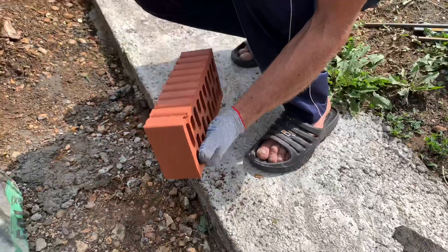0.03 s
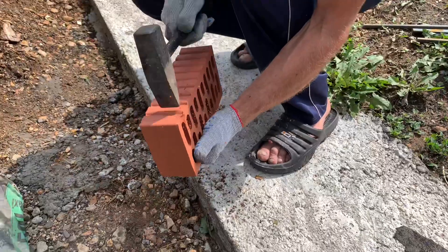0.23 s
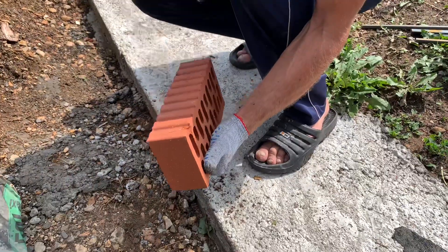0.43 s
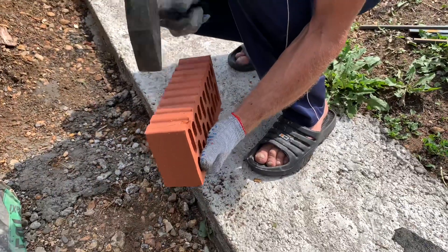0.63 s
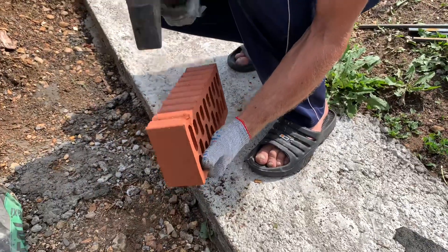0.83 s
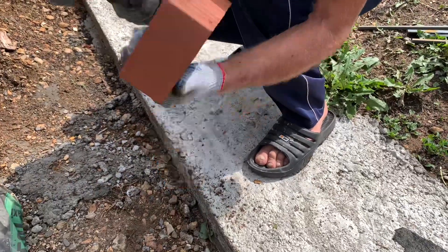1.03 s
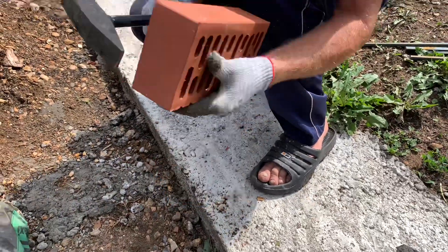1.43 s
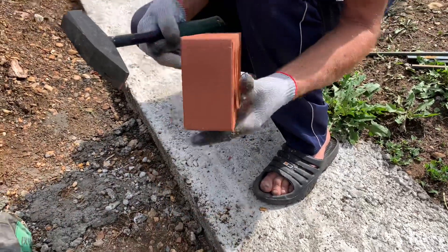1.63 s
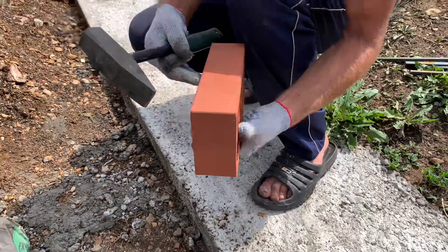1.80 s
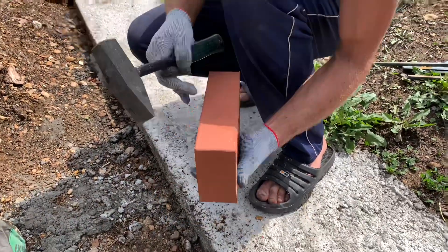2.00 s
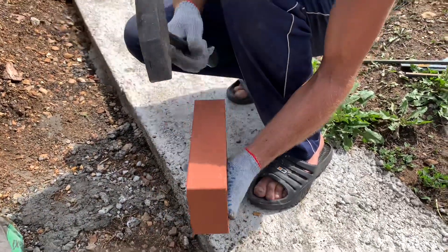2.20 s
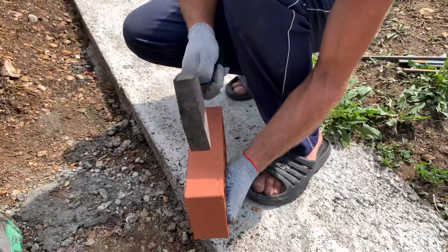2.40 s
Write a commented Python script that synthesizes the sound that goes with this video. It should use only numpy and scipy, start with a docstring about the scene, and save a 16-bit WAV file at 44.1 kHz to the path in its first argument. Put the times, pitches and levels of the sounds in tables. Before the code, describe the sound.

Two sharp hammer taps on a hollow brick, followed by faint glove rubs and bumps.

```python
"""Two sharp taps, close by and outdoors: a heavy hammer on a hollow clay brick on a concrete slab.
Each tap cracks, thuds through the slab and rings the thin clay webs until they are choked; chips tick down.
Gloves then rub, bump and clink the brick as it is turned over.
Behind it are a low rumble, a faint hiss, puffs of air and weak echoes from the yard."""
import sys
import numpy as np
from scipy import signal
from scipy.fft import rfft, irfft, next_fast_len
from scipy.io import wavfile

SR = 44100
rng = np.random.default_rng(int(sys.argv[2]) if len(sys.argv) > 2 else 0)


def put_to_file(sound):
    """Save the sound as 16-bit audio at rate SR, in the file named by the first command-line argument."""
    columns = np.atleast_2d(sound).T  # one column per channel
    safe = np.clip(columns, -1, 1)
    whole_steps = np.round(safe * 32767)
    wavfile.write(sys.argv[1], SR, whole_steps.astype(np.int16))


N = 112454
T = np.arange(N) / SR
LEAD_S = 0.0002133  # left ahead of right
SPREAD, LOW_SPREAD = .45, .25  # side over mid


def hammer():
    """Each blow: contact, a crack and shiver roughened by crumbling clay, a thud, ringing webs."""
    # Each row: start in seconds, then crack, shiver and thud gains in dB.
    blows = [(.2300, -14, -16, -3.5), (.7073, -17.5, -16.5, -9.5)]
    ring_lead_s, ring_pan_db = .00008, 4.5  # louder on the right
    hits, rings = np.zeros((2, N)), np.zeros(N)
    for blow, (start_s, crack_db, shiver_db, thud_db) in enumerate(blows):
        clay = amp(crack_db) * crack(start_s) + amp(shiver_db) * shiver(start_s, blow)
        clay *= uneven(depth_db=3, per_s=900)
        hits += contact(start_s, blow) + clay + amp(thud_db) * thud(start_s)
        rings += web_ring(start_s, blow)
    pan = amp([[-ring_pan_db / 2], [ring_pan_db / 2]])
    return left_first(hits, LEAD_S) + left_first(rings, ring_lead_s) * pan


def contact(start_s, blow):
    """Steel meets clay: a click of very short modes."""
    # Each row: frequency in Hz, t60 in seconds, level in dB in blow 1, in blow 2.
    modes = [(950, .007, -4, -6), (2700, .006, -14, -6), (4600, .003, -14, -10), (9300, .004, 0, -14)]
    return sum(amp(db[blow]) * ring(start_s, hz, t60_s, rise_s=.0006) for hz, t60_s, *db in modes)


def crack(start_s):
    """The clay cracks in a brief broadband burst."""
    # Each row: frequency in Hz, relative density in dB.
    spectrum = [(100, -8), (600, -1), (1200, 2.5), (2500, 0), (5000, -7.5), (7000, -8.5), (9300, -6.5),
                (11500, -11.5), (14500, -16), (16200, -26.5)]
    burst = noise(lambda hz: along(spectrum, hz), SPREAD)
    return burst * envelope(start_s, rise_s=.0011, hold_s=.0013, t60_s=.0039)


def shiver(start_s, blow):
    """The webs shiver densely: noise that decays band by band."""
    # Each row: frequency in Hz, relative density in dB in blow 1, in blow 2.
    spectra = [(80, -20.5, -13.5), (250, -8.5, -7.5), (700, -6.5, -10), (1300, -0.5, -0.5),
               (1830, -5.5, -1), (2400, 4, 12), (2900, -7.5, -8.5), (3800, -3, -5.5), (4700, -14.5, -13),
               (6600, -2.5, -4), (6600, -7, -9.5), (9200, -2.5, -11), (10400, -7, -17), (11600, -16.5, -29),
               (14200, -6, -26), (16200, -23.5, -40)]
    # Each row: frequency in Hz, t60 in seconds.
    decay = [(200, 0.041), (1200, 0.05), (2500, 0.11), (5000, 0.053), (10000, 0.029)]
    rise_s, hold_s = .0017, .0043
    spectrum = [(hz, db[blow]) for hz, *db in spectra]
    dense = noise(lambda hz: along(spectrum, hz), SPREAD)
    return fade(dense, start_s + hold_s, decay) * np.exp(np.minimum(T - start_s, 0) / rise_s)


def thud(start_s):
    """Dull modes of the brick bedded on the slab, alternating in sign."""
    # Each row: frequency in Hz, relative level in dB, t60 in seconds.
    modes = [(118, -21.5, 0.044), (190, -6, 0.027), (287, -3, 0.015), (529, -2.5, 0.021)]
    late_s = .0014
    return sum((-1) ** i * amp(db) * ring(start_s + late_s, hz, t60_s, rise_s=.0013)
               for i, (hz, db, t60_s) in enumerate(modes))


def web_ring(start_s, blow):
    """The thin clay webs ring freely, then are choked."""
    # Each row: frequency in Hz, base t60 in seconds, choke drop in dB, level in dB in blow 1, in blow 2.
    modes = [(738, .05, 3.5, -26.5, -21), (910, .05, 8.5, -29, -36.5), (1250, 0.036, 8.5, -19.5, -49),
             (1464, 0.028, 6.5, -30, -27), (1668, 0.036, 6.5, -33.5, -19.5), (2055, .05, 12, -23.5, -14),
             (2370, 0.1, 8.5, -27.5, -19), (2490, .055, 7.5, -25.5, -12.5), (2087, .17, 24, -12.5, -13.5),
             (1067, .17, 0, -33, -34), (3183, .08, 3, -24, -21), (4190, .12, 7, -32, -32),
             (3810, 0.047, 4, -26.5, -27.5), (5780, 0.04, 4.5, -28, -34.5), (6170, .04, 5, -31, -25),
             (9100, 0.036, 3, -28.5, -21.5), (10080, .035, -0.5, -22.5, -29.5)]
    # Each row, one per blow: free ringing in seconds, t60 factor.
    ringing = [(.034, 1.25), (.018, .8)]
    free_s, t60_factor = ringing[blow]
    choke_s = .005
    choked = np.clip((T - start_s - free_s) / choke_s, 0, 1)
    webs = np.zeros(N)
    for hz, t60_s, drop_db, *db in modes:
        mode = ring(start_s + rng.uniform(0, .001), hz, t60_s * t60_factor, rise_s=.0015)
        webs += amp(db[blow] - drop_db * choked) * mode
    return webs


def chips():
    """Crumbs of clay and grit tick on the concrete."""
    # Each row: start in seconds, level in dB, centre in Hz, t60 in seconds.
    ticks = [(.0065, -34, 8360, 0.0074), (0.0211, -26, 11100, 0.006), (0.075, -54.5, 12500, 0.0086),
             (0.19, -52, 5000, 0.2), (.411, -40, 2050, .025), (.412, -43, 11120, .012),
             (0.422, -49.5, 12000, 0.031), (0.4482, -42, 2222, 0.029), (.476, -59, 2930, 0.015),
             (.5437, -59, 10180, 0.013), (1.598, -39, 10780, 0.013), (1.598, -50.5, 1750, 0.078)]
    return sum(amp(db) * noise(band(hz, octaves=.51), SPREAD)
               * envelope(start_s, rise_s=.0001, hold_s=0, t60_s=t60_s)
               for start_s, db, hz, t60_s in ticks)


def handling():
    """Gloves rub, bump and clink the brick while turning it."""
    # Each row: start in seconds, level in dB, hold in seconds, centre in Hz, half-width in octaves.
    strokes = [(0.103, -69, 0.082, 5530, .15), (1.06, -64.5, 0.064, 5300, 0.16),
               (1.124, -55, 0.017, 3600, 0.11), (1.31, -64.5, .07, 3680, 0.13),
               (1.315, -62.5, 0.0079, 11000, .5), (1.768, -60.5, 0.046, 5030, 0.28),
               (1.967, -60, 0.011, 1920, 0.181), (1.967, -56.5, .012, 9660, 0.62),
               (2.171, -55.5, 0.061, 3800, 0.21), (2.316, -56.5, 0.074, 3570, 0.38),
               (2.32, -57, 0.057, 10000, .5)]
    # Each row: start in seconds, level in dB, hold in seconds.
    nudges = [(1.247, -46.5, 0.0082), (1.412, -41.5, 0.014), (1.698, -47.5, .06), (1.976, -40, 0.006),
              (2.011, -51.5, 0.023), (2.221, -44.5, .045), (2.501, -45.5, .025)]
    # Each row: frequency in Hz, relative density in dB.
    bump_spectrum = [(60, -21.5), (120, -15), (170, 2), (235, -16), (330, 4.5), (450, -13), (700, -25),
                     (2000, -55), (6000, -39.5)]
    # Each row: start in seconds, level in dB, frequency in Hz, t60 in seconds.
    clink_modes = [(1.249, -53.5, 1511, 0.18), (1.597, -44.5, 1690, 0.18)]
    rubs = sum(amp(db) * noise(band(hz, octaves), spread=1)
               * envelope(start_s, rise_s=.01, hold_s=hold_s, t60_s=.1)
               for start_s, db, hold_s, hz, octaves in strokes)
    bumps = low_bursts(nudges, bump_spectrum, rise_s=.0074, t60_s=.071)
    clinks = sum(amp(db) * ring(start_s, hz, t60_s, rise_s=.00095)
                 for start_s, db, hz, t60_s in clink_modes)
    stick_slip = uneven(depth_db=1, per_s=450)
    return rubs * stick_slip + bumps + clinks


def yard(x):
    """Echoes from two nearby walls and the weak, diffuse tail of the open yard."""
    # Each row: delay in seconds, level in dB, centre in Hz.
    walls = [(.018, -19, 1500), (.062, -31.5, 594)]
    # Each row: frequency in Hz, t60 in seconds.
    decay = [(200, 0.098), (1000, 0.36), (2200, 0.27), (5000, 0.1), (12000, 0.2)]
    # Each row: frequency in Hz, gain in dB.
    tail_gain = [(150, -33), (650, -22.5), (1000, -26), (2200, -23.5), (4000, -17.5), (9000, -22.5),
                 (15000, -26)]
    tail = fade(rng.standard_normal((2, N)), 0, decay)
    tail = filtered(tail / np.linalg.norm(tail[0]), lambda hz: amp(along(tail_gain, hz)))
    echoes = filtered(x, lambda hz: sum(
        amp(db + band(centre_hz, octaves=.6)(hz)) * np.exp(-2j * np.pi * hz * delay_s)
        for delay_s, db, centre_hz in walls))
    return echoes + signal.fftconvolve(x, tail, axes=1)[:, :N]


def air():
    """Wide, slightly swelling hiss, low rumble and puffs of air on the microphone."""
    # Each row: time in seconds, hiss level in dB, rumble level in dB.
    levels = [(0, -54, -56.5), (0.158, -64.5, -51.5), (.34, -65, -64), (.47, -68.5, -61),
              (.6, -67.5, -55.5), (.82, -69.5, -61), (0.929, -63.5, -53), (1.03, -63.5, -58.5),
              (1.13, -59.5, -54), (1.55, -58.5, -55), (1.871, -59.5, -60), (1.98, -57, -53.5),
              (2.251, -57.5, -57), (2.35, -57.5, -50), (2.43, -59, -55.5), (2.55, -54.5, -70.5)]
    # Each row: start in seconds, level in dB, hold in seconds.
    puffs = [(0.506, -52, 0.11), (.655, -31, 0.014), (1.121, -47.5, .04), (1.458, -50, .11),
             (2.11, -58.5, 0.11), (2.45, -45.5, 0.014)]
    # Each row of the three spectra: frequency in Hz, relative density in dB.
    hiss_spectrum = [(100, -14.5), (500, 5), (1300, 2), (2200, 5), (4000, 3), (6000, -1), (7200, -6),
                     (9000, 5), (11600, -10.5), (14800, 1), (16200, -31)]
    rumble_spectrum = [(20, -8), (55, 8.5), (110, -3), (170, -4.5), (240, -11), (340, -3), (600, -18.5),
                       (1500, -78.5)]
    puff_spectrum = [(20, -37.5), (45, -5), (75, 8.5), (110, -6), (250, -27), (800, -64.5)]
    time_s, hiss_db, rumble_db = np.transpose(levels)
    hiss = amp(np.interp(T, time_s, hiss_db)) * noise(lambda hz: along(hiss_spectrum, hz), spread=1)
    rumble = noise(lambda hz: along(rumble_spectrum, hz), LOW_SPREAD)
    rumble *= amp(np.interp(T, time_s, rumble_db))
    hiss *= uneven(depth_db=2, per_s=14)
    return hiss + rumble + low_bursts(puffs, puff_spectrum, rise_s=.0042, t60_s=.06)


def amp(db):
    """Decibels to gain."""
    return 10 ** (np.asarray(db) / 20)


def along(points, hz):
    """Interpolate (Hz, value) points on a log frequency axis."""
    knots_hz, values = np.transpose(points)
    return np.interp(np.log(hz + 1), np.log(knots_hz + 1), values)


def band(centre_hz, octaves):
    """A hump in dB against Hz, 3 dB down at +-octaves."""
    return lambda hz: -10 * np.log10(1 + (np.log2((hz + 1) / centre_hz) / octaves) ** 4)


def filtered(x, response):
    """Multiply the spectrum of x by response(hz)."""
    size = next_fast_len(N + SR // 2)
    return irfft(rfft(x, size) * response(np.fft.rfftfreq(size, 1 / SR)), size)[..., :N]


def noise(colour, spread):
    """Stereo noise of rms 1; colour maps Hz to dB, spread is side over mid."""
    mid, side = filtered(rng.standard_normal((2, N)), lambda hz: amp(colour(hz)))
    pair = np.array([mid + spread * side, mid - spread * side])
    return pair / pair.std()


def envelope(start_s, rise_s, hold_s, t60_s):
    """Swell up to start_s, hold, decay."""
    attack = np.exp(np.minimum(T - start_s, 0) / rise_s)
    return attack * 1000. ** (-np.maximum(T - start_s - hold_s, 0) / t60_s)


def low_bursts(events, spectrum, rise_s, t60_s):
    """Near-mono noise that swells once per event."""
    gain = sum(amp(db) * envelope(start_s, rise_s, hold_s, t60_s) for start_s, db, hold_s in events)
    return gain * noise(lambda hz: along(spectrum, hz), LOW_SPREAD)


def ring(start_s, hz, t60_s, rise_s):
    """One damped mode."""
    t = np.maximum(T - start_s, 0)
    return np.sin(2 * np.pi * hz * t) * 1000. ** (-t / t60_s) * (1 - np.exp(-t / rise_s))


def fade(x, start_s, decay):
    """From start_s each band decays at its own rate; decay holds (Hz, t60 in seconds) points."""
    hz, t, bands = signal.stft(x, SR, nperseg=128)
    bands *= 1000. ** (-np.maximum(t - start_s, 0) / along(decay, hz)[:, None])
    return signal.istft(bands, SR)[1][:, :N]


def left_first(x, lead_s):
    """Put the left channel lead_s ahead of the right."""
    return filtered(x, lambda hz: np.exp(1j * np.pi * hz * lead_s * np.array([[1], [-1]])))


def uneven(depth_db, per_s):
    """Random gain of rms 1 that changes per_s times a second."""
    knots = rng.standard_normal(N // 8)
    gain = amp(depth_db * np.interp(T * per_s, np.arange(len(knots)), knots))
    return gain / np.sqrt(np.mean(gain ** 2))


def scene():
    """The work on the brick, its echo and the open air."""
    work = hammer() + left_first(chips() + handling(), LEAD_S)
    return work + yard(work) + air()


def record(dry):
    """Soft-clip the highest peaks, then limit the band."""
    top_hz = 16400
    rounded = dry / (1 + dry ** 4) ** (1 / 4)
    return filtered(rounded, lambda hz: hz < top_hz)


dry = scene()
out = record(dry)
put_to_file(out)
```